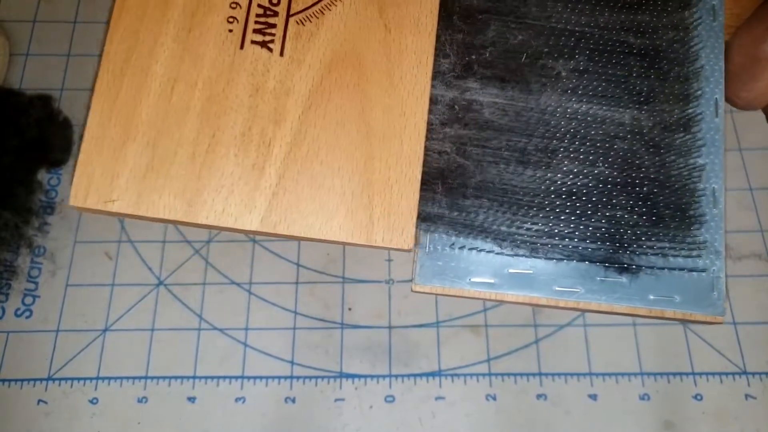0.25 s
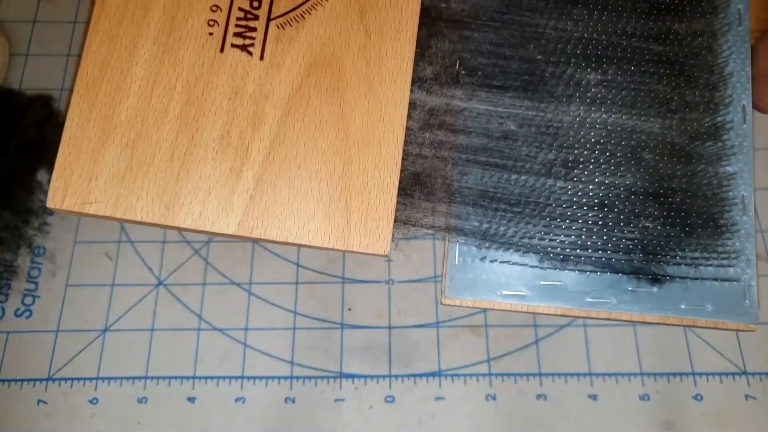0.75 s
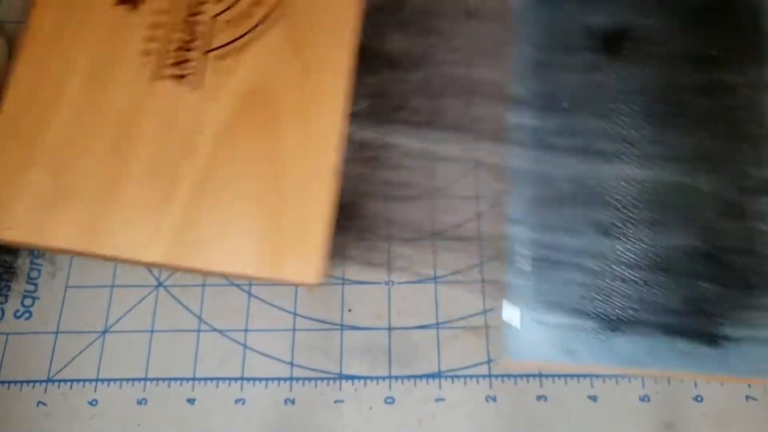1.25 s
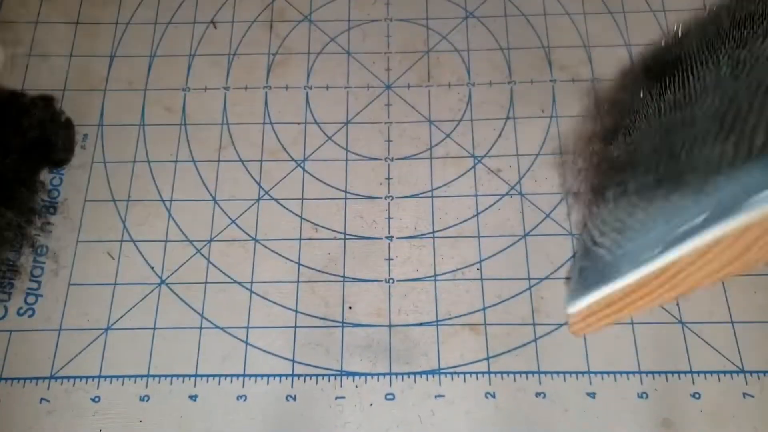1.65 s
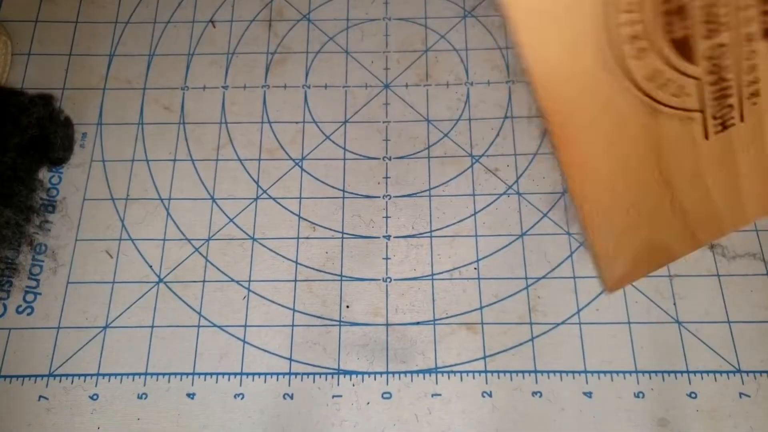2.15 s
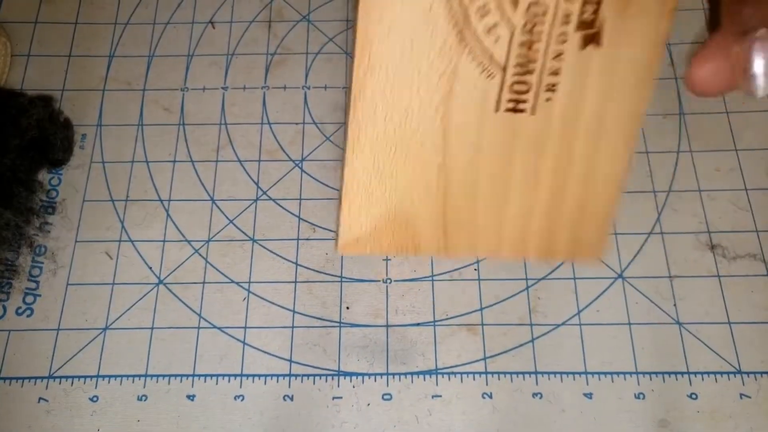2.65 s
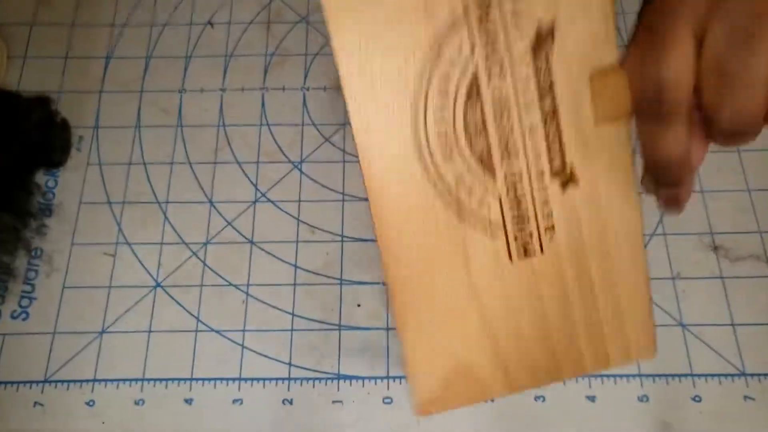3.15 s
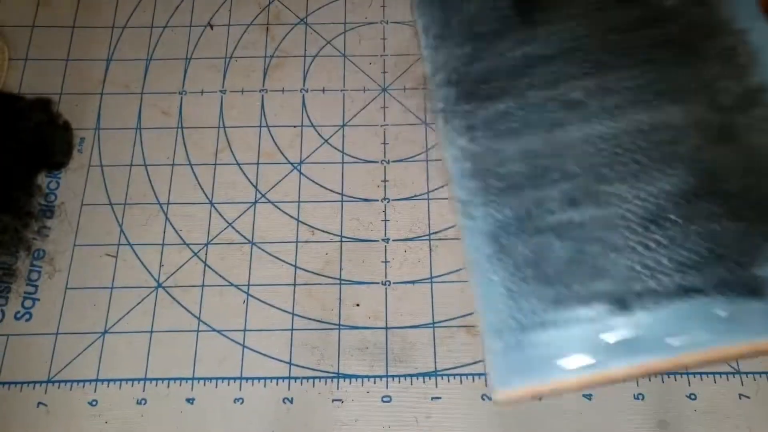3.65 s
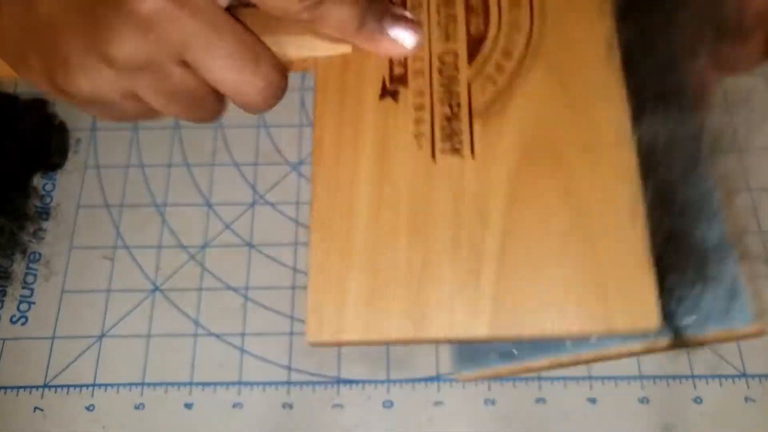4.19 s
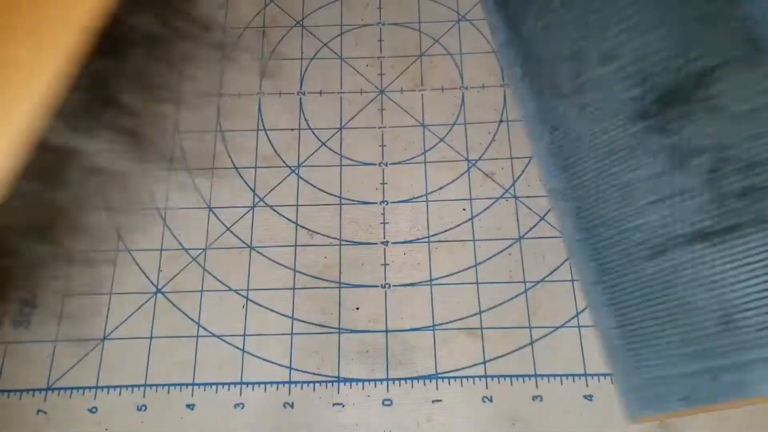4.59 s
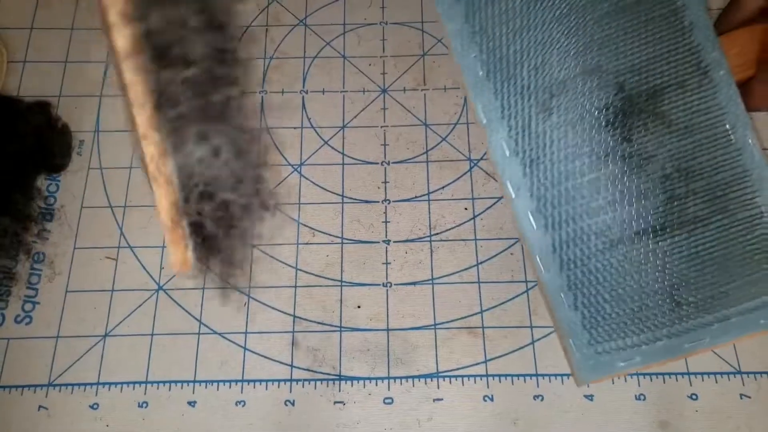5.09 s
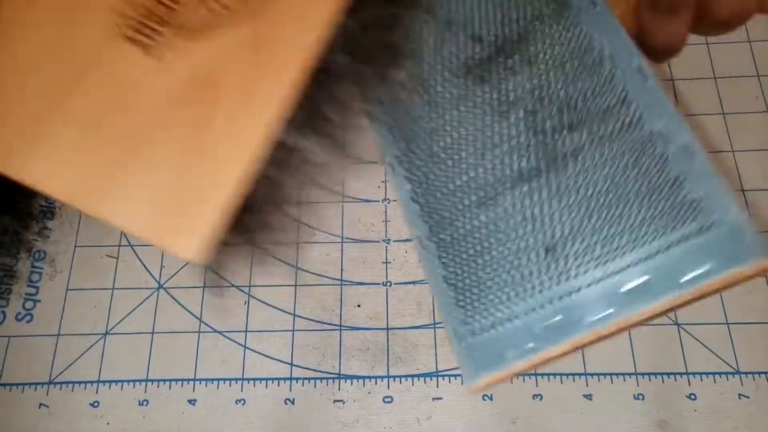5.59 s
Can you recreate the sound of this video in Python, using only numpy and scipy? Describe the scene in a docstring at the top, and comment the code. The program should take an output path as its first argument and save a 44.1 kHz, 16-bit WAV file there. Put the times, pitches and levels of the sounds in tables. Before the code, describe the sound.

Close stereo capture of two wooden hand carders in a small quiet room. Wool first slides through wire teeth with a soft fine hiss in two pulls, then hands faintly rustle on the handles. Two dull knocks land on the table, the second weaker. After a pause the paddles clack together and the teeth rake in a scratchy stroke, followed by a shorter one, over low rumble.

```python
"""Two wooden hand carders with wire teeth are worked over a table in a small quiet room.
Wool is drawn between them with a fine hiss, the handles slide in the hands, one carder knocks twice on
the table; then the paddles clack together and their teeth scrape across each other in two strokes.
Friction is built from streams of tiny random slips through a colouring filter, blows from clicks with a
rattle that ring decaying modes and notes; under it all lie a low rumble, faint hiss and a wavering drone."""
import sys
import numpy as np
from scipy import signal
from scipy.fft import rfft, irfft, next_fast_len
from scipy.io import wavfile

SR = 44100
rng = np.random.default_rng(int(sys.argv[2]) if len(sys.argv) > 2 else 0)


def dump_mix(stems):
    """Bounce the given channels to the path in sys.argv[1] as a 16-bit WAV at rate SR."""
    frames = np.atleast_2d(stems).T  # one column per channel
    limited = np.clip(frames, -1, 1)  # hard clip at full scale
    pcm = np.round(limited * 32767).astype(np.int16)
    wavfile.write(sys.argv[1], SR, pcm)


N = 257103
TIME = np.arange(N) / SR
SIZE = next_fast_len(N + SR // 2, real=True) // 2 * 2
FREQS = np.maximum(np.arange(SIZE // 2 + 1) * SR / SIZE, 1)

# All spectra give relative levels. Rumble and hiss of the room: pitch_hz, level_db
ROOM_TONE_SPECTRUM = [(15, -49.5), (25, -25.5), (33, -15), (43, -3.5), (59, 1), (97, -5.5), (150, -12.5),
                      (225, -16), (330, -30.5), (500, -34.5), (700, -38), (1760, -40), (4000, -45.5),
                      (9000, -55), (15000, -42.5)]
# dull drone of the room: pitch_hz, level_db
DRONE_SPECTRUM = [(60, -26), (110, -11), (160, 1.5), (225, 0.5), (270, -11), (340, -15), (600, -35),
                  (2000, -61.5)]
# wavering of the drone, before its trim: time_s, level_db
DRONE_LEVEL = [(0, -62.5), (1.1, -61), (2.2, -66.5), (2.7, -61), (3.85, -73), (4.6, -59.5), (5.4, -61),
               (5.8, -55)]
RUMBLE_DB = -61
# echoes off near walls: band_hz, level_db, t60_s
ROOM_ECHOES = [(90, -20.5, .25), (250, -16.5, 0.16), (700, -6.5, 0.21), (1970, -7, 0.13), (5500, -2, 0.17),
               (14000, -9, 0.15)]
# left minus right: pitch_hz, level_db
SHADE = [(60, -.5), (200, -2), (700, -3), (1300, -3), (2400, -3.5), (4400, -5.5), (8100, -8), (15000, -20)]
# how alike left and right are: pitch_hz, likeness_0_to_1
LIKENESS = [(60, 0.98), (250, 0.7), (600, 0.8), (1500, 0.4), (3000, 0.02), (6000, 0), (15000, .25)]
CUTOFF_HZ = 16200

# soft nudges that reach the table: start_s, level_db
NUDGES = [(1.504, -43), (3.605, -44.5), (4.345, -43.5)]

# a handle slides in the hand, before trims: start_s, length_s, skin_hiss_db, grip_rub_db
SLIDES = [(1.743, .018, -67, -75.5), (1.843, .022, -60, -72), (1.985, .08, -65.5, -78),
          (2.04, .035, -72, -64.5), (2.232, .04, -72, -74), (2.415, .04, -64, -73.5),
          (2.572, .025, -67, -86), (2.762, 0.03, -66, -71), (3.19, .03, -76, -76.5),
          (3.36, .16, -67.5, -76), (3.638, .015, -67, -98), (4.585, 0.026, -79.5, -92)]
# skin hiss: pitch_hz, level_db
SKIN_SPECTRUM = [(3000, -34), (6000, -21.5), (9500, -15), (12000, -6), (14000, -3), (16000, -6)]
# grip rub: pitch_hz, level_db
GRIP_SPECTRUM = [(400, -14.5), (800, -1.5), (1300, -10), (1900, -7.5), (2400, -5), (3100, -2.5),
                 (4600, -3.5), (6200, -1.5), (8000, -8), (11000, -27)]
# the skin sticks and slips with a soft squeak: start_s, length_s, pitch_hz, level_db
SQUEAKS = [(1.845, .02, 3250, -75), (2.01, .06, 2700, -72)]
# a faint steady rub of the hands while the carders are turned, before the same trims
TURNING_FROM_S, TURNING_TO_S = 1.68, 3.62
TURNING_HISS_DB, TURNING_RUB_DB = -85, -91
# flanks of a slide of ordinary length; shorter slides start and stop more abruptly
SLIDE_ATTACK_DB_PER_S, SLIDE_RELEASE_DB_PER_S = 330, 290
SLIDE_ORDINARY_S, SLIDE_STEEPENS = .04, .35   # steepens: exponent

# how fast the wool is drawn through the teeth, in two pulls: time_s, speed_db
WOOL_PULL = [(0.0, 0.5), (0.06, 0.5), (0.32, -0.5), (0.49, -7.5), (0.62, 3), (0.71, 3), (0.82, -18),
             (0.98, -2), (1.16, 0), (1.23, 6.5), (1.3, 6.5), (1.42, -21)]
# murmur of the board behind the wool: pitch_hz, level_db
MURMUR_SPECTRUM = [(250, -3), (480, -11), (620, -4), (800, -7.5), (960, -1), (1100, -2), (1300, -8.5),
                   (1550, -19), (1900, -15), (2200, -24.5), (3500, -32), (6000, -31)]
# hiss of fibres on wires: pitch_hz, level_db
FIBRE_SPECTRUM = [(2000, -10), (3800, -17), (5000, -11.5), (6400, -8), (7600, -1), (8800, -8.5),
                  (10500, -7), (13000, -2), (15500, 2.5), (17000, -38)]
MURMUR_DB, MURMUR_FOLLOWS, FIBRE_DB = -61, 1.27, -63   # the murmur grows faster than the hiss

# carder set down on the table: start_s, edge_crack_db, thump_db, thump_delay_s, push_width_s
KNOCKS = [(2.8274, -10.5, 0.5, .0059, 0.00075), (3.0833, -19.5, -5.5, .0066, 0.0009)]
# table modes: pitch_hz, level_db, t60_s
TABLE_MODES = [(73, -24, 0.13), (127, -29.5, 0.062), (210, -34.5, 0.089), (245, -34.5, .12),
               (350, -29.5, .09), (420, -27, .14), (620, -46.5, .1)]
# crack of wood: pitch_hz, level_db
CRACK_SPECTRUM = [(150, 1.5), (350, 0), (550, -5.5), (680, 0.5), (850, 4.5), (1100, -7), (1400, -0.5),
                  (1850, 1), (2450, -13), (3050, -13.5), (3800, -14), (5000, -11.5), (7000, -15),
                  (10000, -22.5), (15000, -17.5)]

# touches of paddles and teeth: start_s, wood_db, wire_tick_db, note_hz, note_db
TOUCHES = [(2.0742, -47.5, -44, 2650, -41.5), (2.172, -77, -72, 810, -57), (2.8295, -46, -29, 3130, -28),
           (3.0833, -26, -34, 1330, -34), (3.1488, -58, -49, 2000, -42), (3.1576, -40, -47, 480, -36.5),
           (3.3682, -49, -29, 903, -44), (4.0338, -28, -36, 2340, -31), (4.051, -28, -30, 4160, -38),
           (4.1025, -21.5, -25, 300, -34), (4.2044, -53, -53, 1220, -39), (4.516, -70, -89, 415, -47),
           (5.4355, -58, -58, 1410, -40), (5.4385, -41, -44, 350, -35.5), (5.479, -54, -58, 1300, -39),
           (5.556, -45, -49, 1450, -42), (5.745, -91, -89, 430, -47)]
# paddle modes: pitch_hz, level_db, t60_s
PADDLE_MODES = [(336, -0.5, 0.042), (427, -6.5, .07), (610, -9, 0.04), (719, -4, 0.061), (830, -9, 0.031),
                (1036, -11, 0.065), (1160, -8.5, 0.075), (1280, -16, .04), (1614, -12, 0.074),
                (1990, -3, .05), (2330, -9.5, 0.031), (2652, -6, 0.033), (3120, -8.5, 0.036),
                (3700, -22, .025), (4130, -20.5, .03), (5350, -22.5, 0.016)]
# tick of wire teeth: pitch_hz, level_db
TICK_SPECTRUM = [(800, 2), (2500, -13), (5000, -5.5), (7500, -4.5), (9500, -12.5), (12500, -5.5),
                 (15500, -2.5), (17500, -4.5)]
# how the clack develops: share_of_run_0_to_1, wood_db, wire_tick_db, note_db
CLACK = [(0, -33, -44, -30), (.5, -22.5, -27, -23.5), (1, -23, -20.5, -27)]
# a quick run of contacts, from the edge to the whole face
CLACK_S, CONTACT_GAP_S, CONTACT_SCATTER = 3.9703, .0029, .3   # scatter as a share of the gap
CLACK_FIRST_HZ, CLACK_LAST_HZ = 2800, 350   # the note sinks as the contact widens
PRESSED_FROM_S, PRESSED_TO_S = 4.025, 4.5   # the paddles are pressed together

# teeth raking teeth:
# teeth_meet_s, hardest_pull_s, teeth_part_s, board_rasp_db, tooth_grit_db, wire_hiss_db, rasp_peak_lag_s
STROKES = [(4.004, 4.2, 4.415, -51.5, -53, -59, .04), (5.437, 5.525, 5.668, -54.5, -51.5, -62.5, 0)]
# rasp of the boards: pitch_hz, level_db
RASP_SPECTRUM = [(120, -16), (200, -7), (400, 5.5), (520, -1), (730, 2), (1000, 1), (1250, -2),
                 (1600, -17.5), (3000, -23), (8000, -51)]
# grit of the teeth: pitch_hz, level_db
GRIT_SPECTRUM = [(700, -6), (1150, -3), (1400, -2), (1700, -6), (2000, -5), (2500, -7.5), (3300, -12),
                 (4500, -16), (7000, -22.5), (12000, -34)]
# hiss of the wires: pitch_hz, level_db
WIRE_SPECTRUM = [(2000, -22), (4500, 3.5), (7300, 7.5), (9500, -3.5), (12000, 1), (15500, 4.5), (17000, -7)]
LIGHT_DB, SWELL_DB_PER_S, EASE_DB_PER_S = -7.5, 100, 61   # starts lightly, swells, then eases off
MEET_DB_PER_S, PART_DB_PER_S = 2500, 230
RASP_FOLLOWS, GRIT_FOLLOWS, WIRE_FOLLOWS = .8, 1.3, .8   # share of the force's swing in dB
# single teeth that catch hard: rate, top level over the grit gain, length of their ring
CATCHES_PER_S, CATCH_DB, CATCH_CYCLES = 45, 10, 20
CATCH_LOW_HZ, CATCH_HIGH_HZ = 1000, 2000


def from_db(db):
    """Decibels to gain."""
    return 10 ** (np.asarray(db) / 20)


def rms_one(x):
    """Scale a stereo sound so that its centre has rms 1."""
    return x / np.sqrt(np.mean(x.mean(0) ** 2) + 1e-20)


def gains(rows):
    """Turn level columns into gains in time, fading to silence outside the table."""
    s, *columns = np.transpose(rows)
    inside = np.interp(TIME, [s[0] - .01, s[0], s[-1], s[-1] + .01], [0, 1, 1, 0])
    return [inside * from_db(np.interp(TIME, s, column)) for column in columns]


def at_hz(points):
    """Join a spectrum table along a log-frequency axis."""
    hz, value = np.transpose(points)
    return np.interp(np.log(FREQS), np.log(hz), value)


def colour(x, spectrum):
    """Causal (minimum-phase) filter with the given spectrum, made by folding its cepstrum."""
    cepstrum = irfft(np.log(from_db(at_hz(spectrum))))
    cepstrum[1:SIZE // 2] *= 2
    cepstrum[SIZE // 2 + 1:] = 0
    response = np.exp(rfft(cepstrum))
    return irfft(rfft(x, SIZE) * response)[..., :N]


def cut(x, hz, kind, order=2):
    """Butterworth low- or high-pass."""
    sos = signal.butter(order, min(hz, .45 * SR), kind, fs=SR, output="sos")
    return signal.sosfilt(sos, x + 1e-18)


def ring(x, modes):
    """Each mode answers a unit click with a dying sine; neighbouring modes have opposite signs."""
    out = 0
    for k, (hz, db, t60) in enumerate(modes):
        r = from_db(-60 / (t60 * SR))
        w = 2 * np.pi * hz / SR
        mode = signal.lfilter([0, np.sin(w)], [1, -2 * r * np.cos(w), r * r], x + 1e-18)
        out = out + (-1) ** k * from_db(db) * mode
    return out


def add(out, s, sound):
    """Mix a short sound in at time s."""
    i = int(s * SR)
    out[..., i:i + sound.shape[-1]] += sound[..., :N - i]


def spread(pair):
    """Two unrelated signals become left and right, alike in the bass and less so in the treble."""
    alike = np.clip(at_hz(LIKENESS), 0, .999)
    mid, side = rfft(pair, SIZE)
    centre = np.sqrt(1 + alike) * mid
    sideways = np.sqrt(1 - alike) * side
    return irfft(centre + sideways * [[1], [-1]])[:, :N]


def shade(x):
    """The left side faces away from the hands and gets less treble."""
    ratio = from_db(at_hz(SHADE))
    left_right = np.array([ratio, np.ones_like(ratio)]) * 2 / (1 + ratio)
    return irfft(rfft(x, SIZE) * left_right)[:, :N]


def drift(rate):
    """Random wander through normal draws, rate new ones a second, joined by straight lines."""
    steps = rng.standard_normal(N // 20)
    return np.interp(TIME * rate, np.arange(len(steps)), steps)


def friction(spectrum, per_s, size_db, clump_db, clump_rate):
    """Countless tiny slips of uneven size, in clumps as the surfaces catch and let go."""
    sizes = from_db(size_db * np.minimum(rng.exponential(1, (2, N)), 4)) * rng.choice([-1, 1], (2, N))
    happens = rng.random((2, N)) < per_s / SR
    slips = sizes * happens * from_db(clump_db * drift(clump_rate))
    return rms_one(shade(spread(colour(slips, spectrum))))


def burst(t60, rattle):
    """A click and a brief noisy rattle, as a centre and a sideways signal of unit energy."""
    t = TIME[:SR // 10]
    tail = rng.standard_normal((2, len(t))) * from_db(-60 * t / t60)
    out = rattle * tail / np.linalg.norm(tail, axis=1, keepdims=True)
    out[0, 0] = 1   # the click, in the centre only
    return out / np.linalg.norm(out, axis=1, keepdims=True)


def bell(s, width):
    """A smooth push centred on time s."""
    return np.exp(-.5 * ((TIME - s) / width) ** 2)


def plateau(start, end, attack_db_per_s, release_db_per_s):
    """Envelope in dB: it rises to 0 at the start, holds, and falls from the end."""
    rise = -attack_db_per_s * np.maximum(start - TIME, 0)
    return rise - release_db_per_s * np.maximum(TIME - end, 0)


def room_tone():
    """A low steady rumble under faint hiss, and a dull drone that slowly wavers, from coloured noise."""
    rumble, drone = (rms_one(spread(colour(rng.standard_normal((2, N)), spectrum)))
                     for spectrum in (ROOM_TONE_SPECTRUM, DRONE_SPECTRUM))
    drone_level, = gains(DRONE_LEVEL)
    return from_db(RUMBLE_DB) * rumble + from_db(-1.5) * drone_level * shade(drone)


def room(x):
    """Dense echoes from near walls, dying at their own rate in each band."""
    t = TIME[:SR // 2]
    onset = np.clip((t - .003) / 0.0035, 0, 1)
    hz = np.array(ROOM_ECHOES)[:, 0]
    edges = [20, *np.sqrt(hz[1:] * hz[:-1]), 19000]
    echoes = 0
    for (_, db, t60), low, high in zip(ROOM_ECHOES, edges, edges[1:]):
        tail = rng.standard_normal((2, len(t))) * from_db(-60 * t / t60) * onset
        tail /= np.linalg.norm(tail, axis=1, keepdims=True)
        echoes = echoes + from_db(db) * cut(cut(tail, low, "high"), high, "low")
    return spread(signal.fftconvolve(x[None], echoes, axes=1)[:, :N]) / np.sqrt(2)


def nudges(hz, t60):
    """The table sways briefly when an arm leans on it: a click rings one low mode."""
    clicks = np.zeros(N)
    for s, db in NUDGES:
        clicks[int(s * SR)] = from_db(db)
    return cut(ring(clicks, [(hz, 0, t60)]), hz=150, kind="low")


def slide(s, length, db):
    """Gain of one slide of the hand: it swells, holds and dies away."""
    quickness = (SLIDE_ORDINARY_S / max(length, .005)) ** SLIDE_STEEPENS
    shape_db = plateau(s, s + length, SLIDE_ATTACK_DB_PER_S, SLIDE_RELEASE_DB_PER_S)
    return from_db(db + quickness * shape_db)


def hands():
    """Skin slides over the handles as the carders are turned: tiny slips hiss and the grip rubs."""
    turning = (TURNING_FROM_S, TURNING_TO_S - TURNING_FROM_S, TURNING_HISS_DB, TURNING_RUB_DB)
    slides = [*SLIDES, turning]
    hiss = np.max([slide(s, length, db) for s, length, db, _ in slides], axis=0)
    rub = np.max([slide(s, length, db) for s, length, _, db in slides], axis=0)
    skin = friction(SKIN_SPECTRUM, per_s=70000, size_db=4.0, clump_db=1.5, clump_rate=60)
    grip = friction(GRIP_SPECTRUM, per_s=12000, size_db=2.5, clump_db=1.8, clump_rate=81)
    return from_db(3.0) * hiss * skin + rub * grip


def squeaks(t60):
    """Irregular slips of the skin gather round one pitch: noise rings a short resonance."""
    slips = rng.standard_normal((2, N))
    out = 0
    for s, length, hz, db in SQUEAKS:
        squeak = rms_one(ring(cut(slips, hz, "high"), [(hz, 0, t60)]))
        out = out + slide(s, length, db) * squeak
    return shade(out)


def wool():
    """Fibres slip off the wires: the wires hiss and the board behind them murmurs."""
    speed, = gains(WOOL_PULL)
    murmur = friction(MURMUR_SPECTRUM, per_s=5000, size_db=2.0, clump_db=1.05, clump_rate=29)
    hiss = friction(FIBRE_SPECTRUM, per_s=25000, size_db=3.5, clump_db=.5, clump_rate=62)
    return from_db(MURMUR_DB) * speed ** MURMUR_FOLLOWS * murmur + from_db(FIBRE_DB) * speed * hiss


def knocks():
    """The edge cracks on the table, then the weight of the paddle lands as one soft push."""
    edge = np.zeros((2, N))
    push, recoil = np.zeros((2, N))
    for s, crack_db, thump_db, delay, width in KNOCKS:
        add(edge, s, from_db(crack_db) * burst(t60=0.019, rattle=3.2))
        push += from_db(thump_db) * bell(s + delay, width)
        # from the first contact on, the table top gives way in one slow swing
        give = bell(s + .0043, .0045) * np.clip((TIME - s) / .002, 0, 1)
        recoil += from_db(thump_db - 12) * give
    crack = from_db(13) * colour(edge, CRACK_SPECTRUM)
    held_paddle = from_db(-27) * ring(edge, PADDLE_MODES)
    thump = cut(push - recoil, hz=36, kind="high", order=3)
    return spread(crack + held_paddle) + thump - from_db(-36) * ring(push, TABLE_MODES)


def freedom(pressed_db):
    """Gain of the ringing: paddles pressed together damp each other and hardly stir the room."""
    pressed = (TIME > PRESSED_FROM_S) & (TIME < PRESSED_TO_S)
    return np.where(pressed, from_db(pressed_db), 1)


def clack(count):
    """The touches of one clack: a quick, uneven run, each lower in pitch than the one before."""
    share, *levels = np.transpose(CLACK)
    run = np.linspace(0, 1, count)
    wood_db, wire_db, note_db = (np.interp(run, share, level) for level in levels)
    note_hz = np.geomspace(CLACK_FIRST_HZ, CLACK_LAST_HZ, count)
    scatter = CONTACT_SCATTER * rng.uniform(-1, 1, count)
    s = CLACK_S + CONTACT_GAP_S * (np.arange(count) + scatter)
    return np.transpose([s, wood_db, wire_db, note_hz, note_db])


def touches(free):
    """Each touch rings the whole paddle, ticks its wires and sounds a note set by where it lands."""
    wood, wire = np.zeros((2, 2, N))
    note = np.zeros(N)
    t = TIME[:SR // 8]
    for s, wood_db, wire_db, note_hz, note_db in [*TOUCHES, *clack(count=6)]:
        add(wood, s, from_db(wood_db) * burst(t60=0.0083, rattle=0.32))
        add(wire, s, from_db(wire_db) * burst(t60=0.0088, rattle=7.8))
        t60 = 0.013 * (1000 / note_hz) ** 0.75   # low notes last longer
        swell = 1 - np.exp(-2 * note_hz * t)   # a note takes about a cycle to build
        tone = swell * np.sin(2 * np.pi * note_hz * t) * from_db(-60 * t / t60)
        add(note, s, from_db(note_db) * tone)
    wood = cut(wood, hz=4000, kind="low", order=1)
    paddle = from_db(-17.5) * ring(free * wood, PADDLE_MODES)
    crack = from_db(18.0) * colour(wood, CRACK_SPECTRUM)
    tick = from_db(8) * colour(wire, TICK_SPECTRUM)
    return from_db(3.5) * note + spread(paddle + crack + tick)


def force(meet, hardest, part):
    """Force on the teeth: they meet lightly, are pulled harder, ease as the overlap shrinks, and part."""
    pull_db = plateau(hardest, hardest, SWELL_DB_PER_S, EASE_DB_PER_S)
    pull_db = np.where(TIME < hardest, np.maximum(pull_db, LIGHT_DB), pull_db)
    return from_db(pull_db + plateau(meet, part, MEET_DB_PER_S, PART_DB_PER_S))


def catches(grit, count):
    """Now and then one tooth catches hard and lets go with a short ping at one of count pitches."""
    happens = rng.random(N) < CATCHES_PER_S / SR
    clicks = from_db(CATCH_DB) * grit * happens * rng.uniform(.5, 1, N)
    dealt = rng.integers(0, count, N)
    pitches = np.geomspace(CATCH_LOW_HZ, CATCH_HIGH_HZ, count)
    pings = [ring(clicks * (dealt == k), [(hz, 0, CATCH_CYCLES / hz)]) for k, hz in enumerate(pitches)]
    return shade(sum(pings))


def raking():
    """Wire teeth snag and spring free; the stream of snags shakes the boards and rings their modes."""
    rasp = grit = hiss = 0
    for meet, hardest, part, rasp_db, grit_db, wire_db, lag in STROKES:
        pull = force(meet, hardest, part)
        rasp = rasp + from_db(rasp_db) * force(meet, hardest + lag, part) ** RASP_FOLLOWS
        grit = grit + from_db(grit_db) * pull ** GRIT_FOLLOWS
        hiss = hiss + from_db(wire_db) * pull ** WIRE_FOLLOWS
    boards = rasp * friction(RASP_SPECTRUM, per_s=1400, size_db=2.5, clump_db=2.2, clump_rate=80)
    teeth = grit * friction(GRIT_SPECTRUM, per_s=1100, size_db=2.5, clump_db=2.2, clump_rate=130)
    wires = hiss * friction(WIRE_SPECTRUM, per_s=16000, size_db=4.0, clump_db=2.5, clump_rate=130)
    snags = boards + teeth
    ringing = from_db(-47.5) * ring(snags, PADDLE_MODES)
    return snags + ringing + catches(grit, count=9) + wires


def scene():
    """The room, the friction sounds, and the blows with their echoes."""
    free = freedom(pressed_db=-8.0)
    blows = touches(free) + knocks()
    echoes = room(free * blows.mean(0))
    background = room_tone() + nudges(hz=54.8, t60=0.17)
    rubbing = hands() + squeaks(t60=.005) + wool() + raking()
    return background + rubbing + shade(blows + echoes)


def record(dry):
    """A steep elliptic low-pass cuts the top."""
    sos = signal.ellip(10, .1, 80, CUTOFF_HZ, fs=SR, output="sos")
    return signal.sosfilt(sos, dry)


dry = scene()
out = record(dry)
dump_mix(out)
```